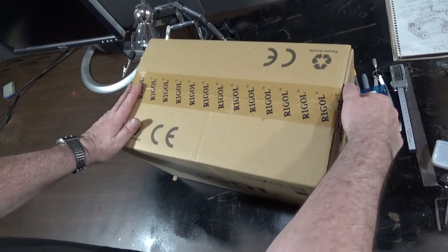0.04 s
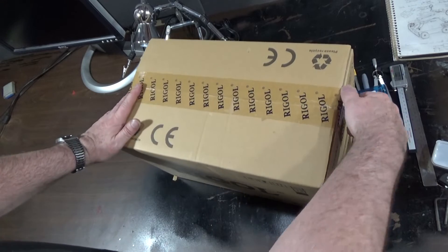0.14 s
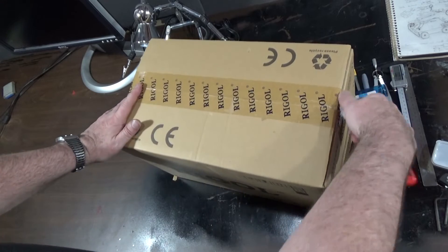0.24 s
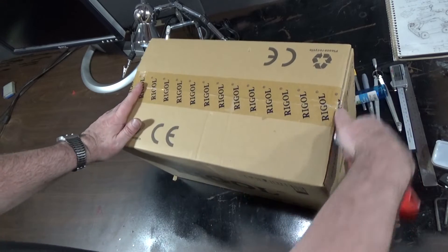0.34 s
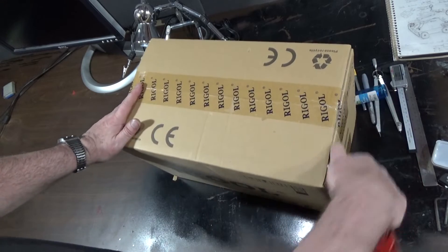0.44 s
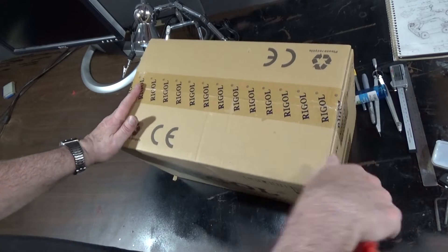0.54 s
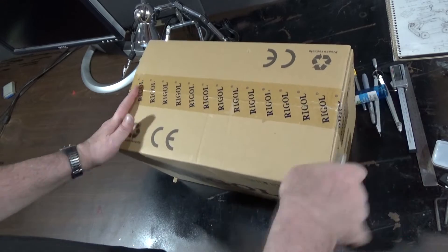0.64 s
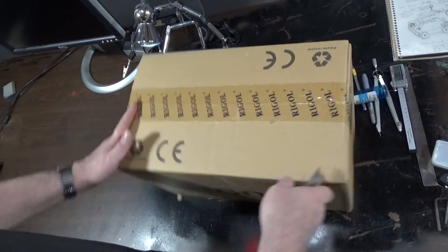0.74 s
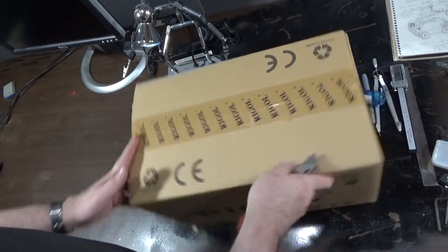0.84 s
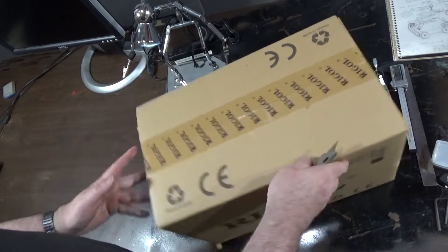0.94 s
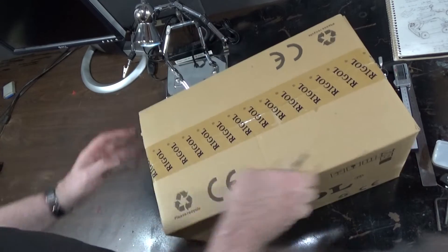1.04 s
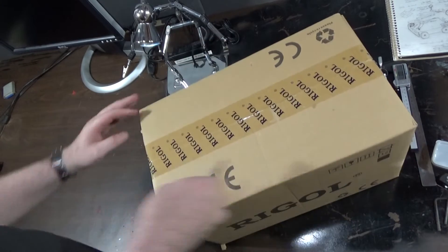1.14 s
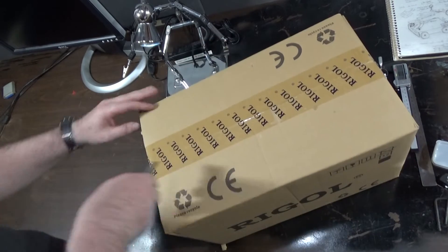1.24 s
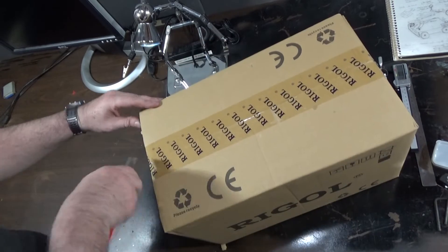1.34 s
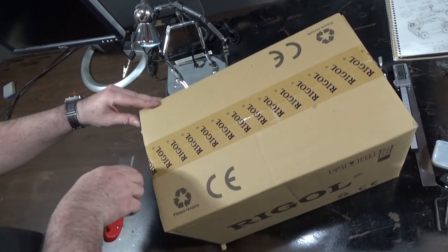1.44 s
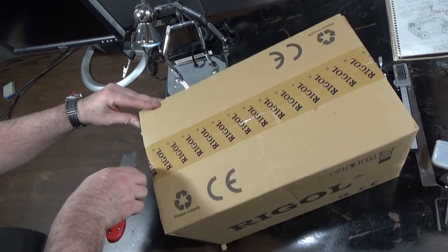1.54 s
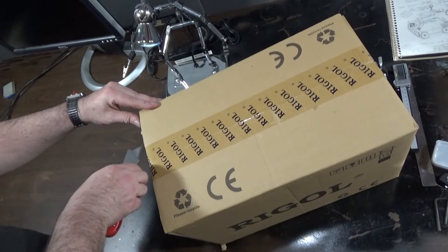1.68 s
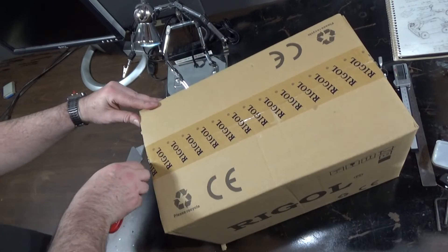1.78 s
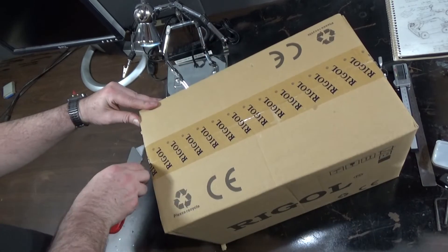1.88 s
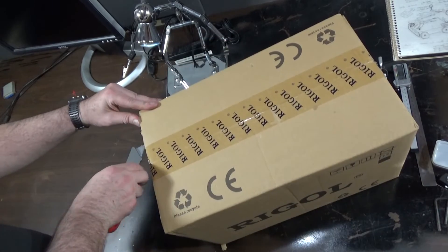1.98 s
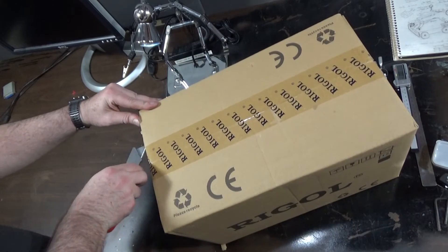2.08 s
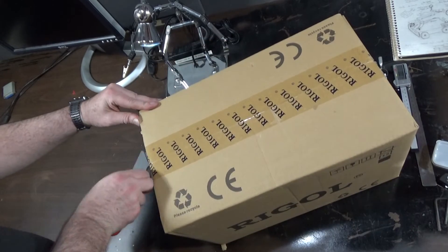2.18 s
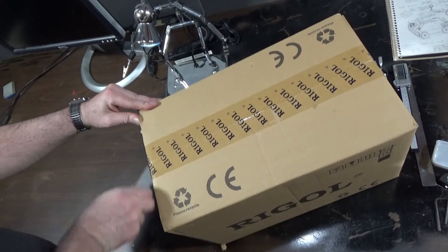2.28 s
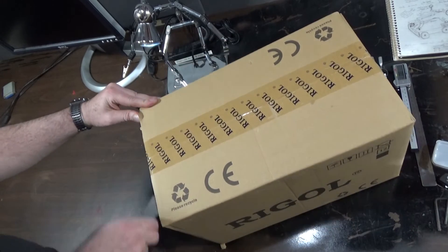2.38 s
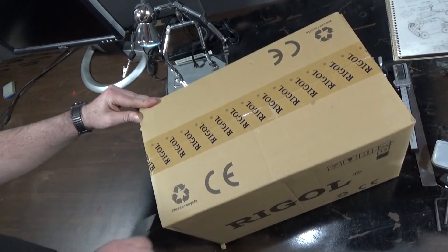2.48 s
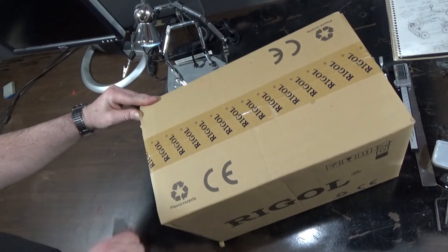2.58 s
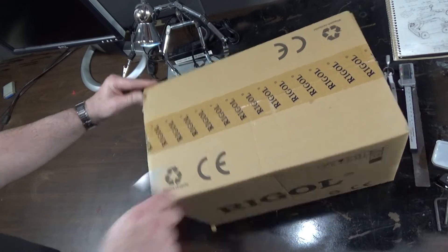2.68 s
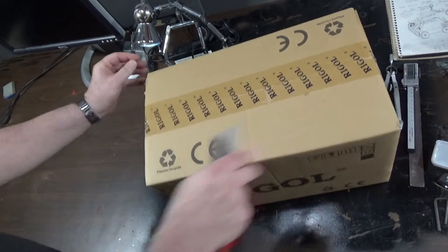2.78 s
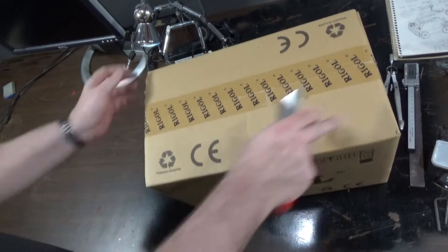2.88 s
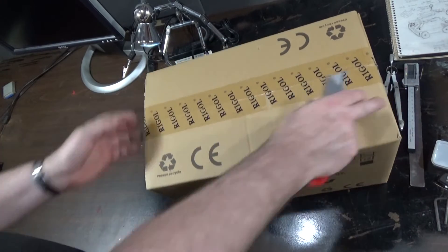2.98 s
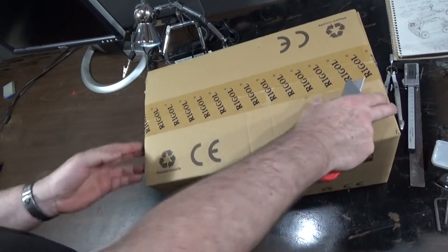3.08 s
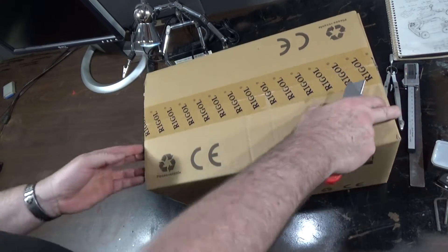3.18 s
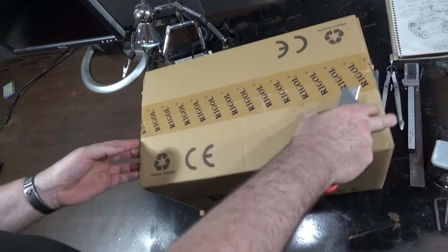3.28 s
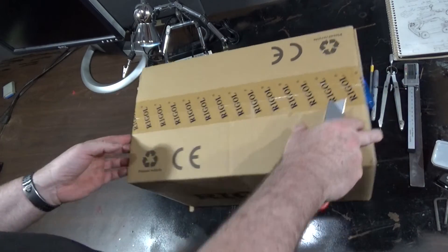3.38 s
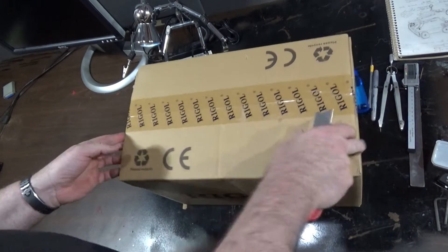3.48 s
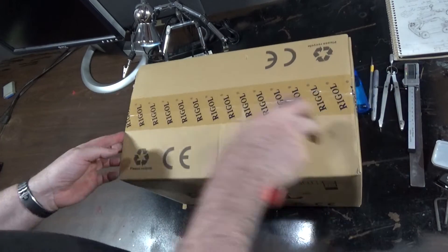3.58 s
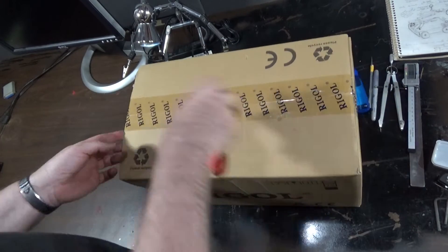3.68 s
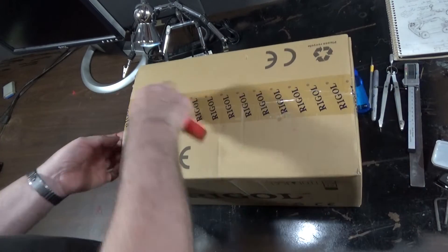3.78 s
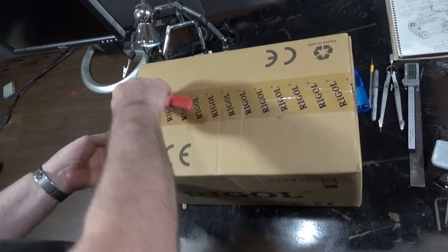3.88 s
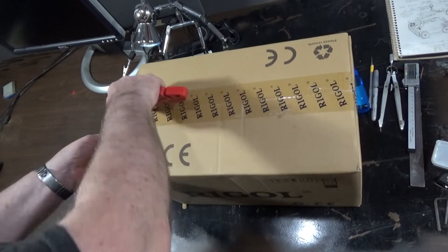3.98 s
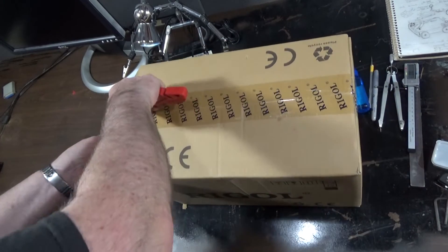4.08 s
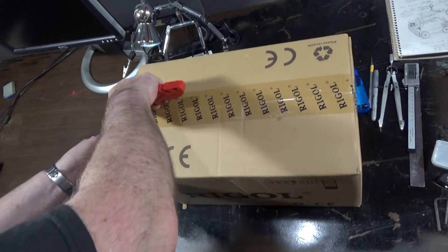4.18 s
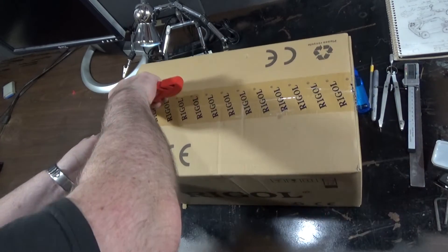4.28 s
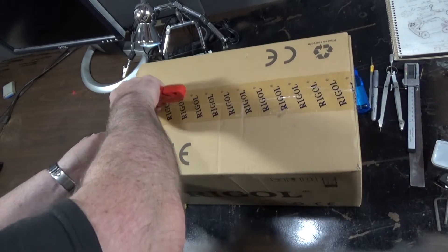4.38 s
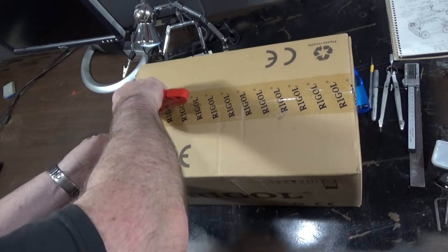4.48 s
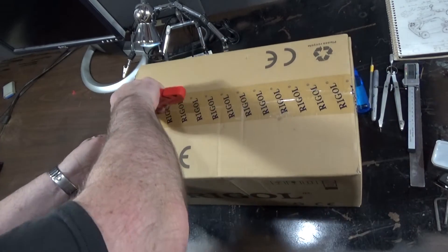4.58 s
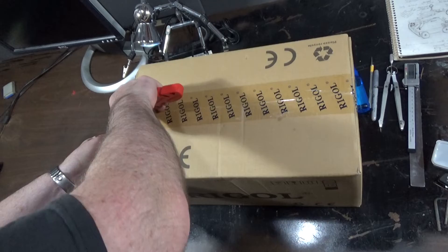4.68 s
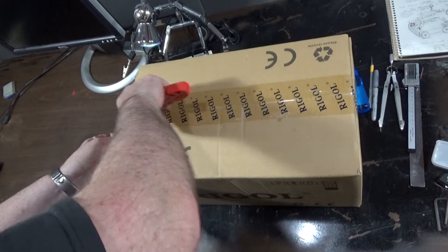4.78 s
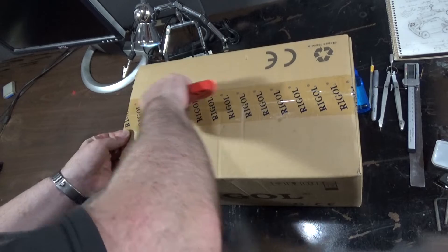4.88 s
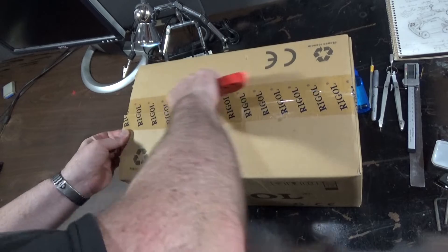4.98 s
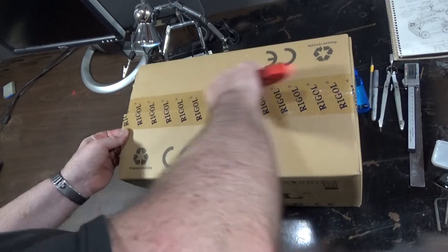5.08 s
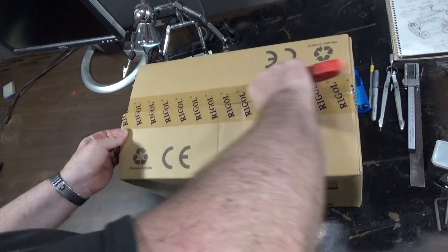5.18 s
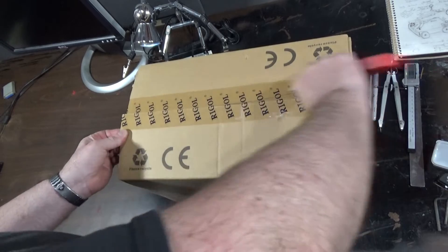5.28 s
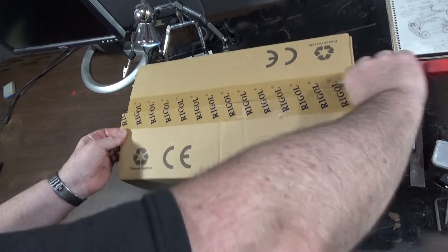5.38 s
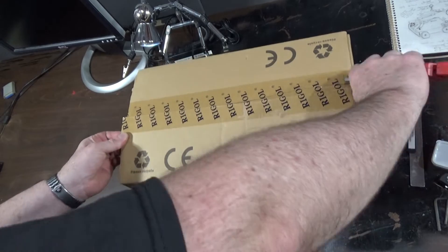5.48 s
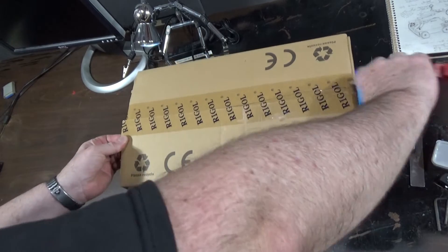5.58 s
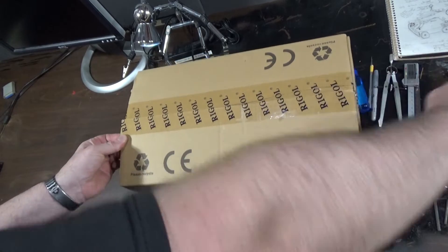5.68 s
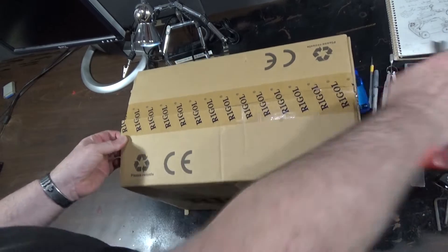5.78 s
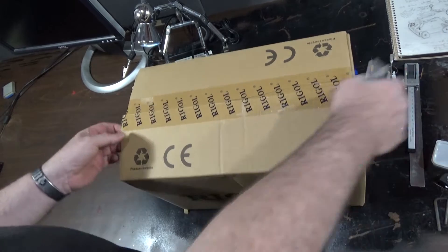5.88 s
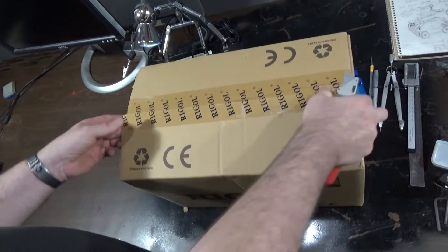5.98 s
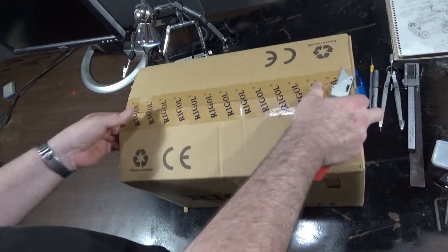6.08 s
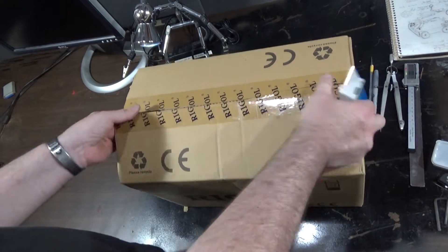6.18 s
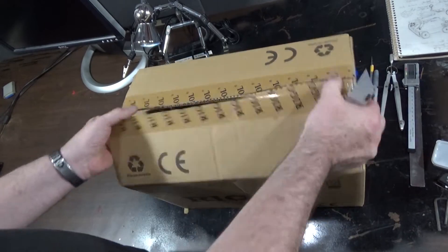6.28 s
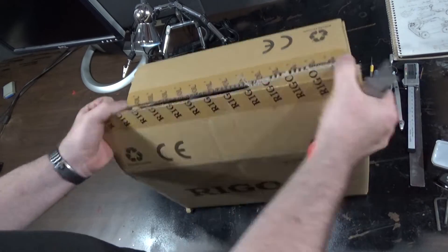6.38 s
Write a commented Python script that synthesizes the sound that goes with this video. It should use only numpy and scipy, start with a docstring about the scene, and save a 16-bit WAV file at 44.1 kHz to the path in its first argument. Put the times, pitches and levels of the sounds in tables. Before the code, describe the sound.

Close up in a small room, taut tape pops and tears, cardboard skids and knocks hollowly, then a blade rips along a seam.

```python
"""A box cutter slits open a taped cardboard box, close by in a small room. Tape pops and tears in short bursts,
and the blade rasps over the cardboard, as random slips that hiss and bumps that make the panels drum.
The box also hisses as it is pushed round on a workbench, and it lands with a row of bumps.
Hands and knife knock, click and brush against it: filtered bursts that ring the panels, or soft friction.
Echoes of the room and a quiet, steady air noise surround it all."""
import sys
import numpy as np
from scipy import signal
from scipy.io import wavfile
from scipy.ndimage import uniform_filter1d, map_coordinates

SR = 44100
rng = np.random.default_rng(int(sys.argv[2]) if len(sys.argv) > 2 else 0)


def wav_record(signal):
    """Record a signal, one row per channel, as 16-bit PCM in the file named by sys.argv[1]."""
    frames = np.transpose(np.atleast_2d(signal))
    bounded = np.clip(frames, -1, 1)
    # unit amplitude maps onto the largest positive 16-bit level
    quanta = np.round(bounded * 32767).astype(np.int16)
    wavfile.write(sys.argv[1], SR, quanta)


N = 283803

# All levels in the tables are relative: the functions that use them may trim them further.
# the long slit down the top seam: (t/s, hiss/dB, drumming/dB)
SEAM_CUT = [(4.77, -42, -50), (4.774, -35.5, -37), (4.826, -32.5, -37), (4.892, -27, -27),
            (4.926, -28, -33.5), (5.07, -22, -17.5), (5.194, -23.5, -16), (5.266, -27, -22.5),
            (5.344, -20, -13.5), (5.46, -24.5, -26.5), (5.5, -35.5, -59), (5.54, -55, -41)]
# colour of the hiss at the taped ends and of tearing tape: (f/Hz, level/dB)
END_HISS = [(400, -9), (750, -0.5), (1200, -2.5), (2000, 0), (5000, -4.5), (8000, 2.5), (10000, -4.5),
            (12000, -18), (16000, -34)]
# colour of the hiss at the edge and of crunching paper: (f/Hz, level/dB)
EDGE_HISS = [(400, -14), (750, 10.5), (1400, 1.5), (2600, -1.5), (4600, -6.5), (6500, -1.5), (9100, -4),
             (12000, -19), (16000, -36)]
# how cuts at the ends and the edge push on the panels: (f/Hz, level/dB)
EDGE_PUSH = [(25, -12), (70, 5), (150, 2.5), (300, 1.5), (500, 3.5), (800, -4), (1500, -10), (3500, -51)]
# how sliding and brushing push on the panels: (f/Hz, level/dB)
SLIDE_PUSH = [(25, -21), (70, -5.5), (130, -5), (220, -4), (400, -3.5), (800, -2), (1400, -21.5),
              (3000, -51)]


def cutting():
    """The scrape of the blade also rings blade, tape and box corner, and the lid drones along."""
    scrape = end_cuts() + seam_cut() + edge_cuts()
    return scrape + blade_ring(scrape) + corner(scrape) + lid_drone()


def end_cuts():
    """The blade is drawn through the tape at the ends of the box, with few, uneven slips: it crackles."""
    # (start t/s, rise/s, hold/s, fall/s, hiss/dB, drumming/dB)
    end_strokes = [(0.15, 0.055, 0.16, .17, -36.5, -47.5), (2.178, 0.016, .008, 0.055, -32, -42),
                   (2.23, .12, 0.11, 0.11, -36, -41.5)]
    gains = strokes(end_strokes, shape=2.2, drum_share=1.0)
    grip = grip_of(judder_db=1.0, judder_hz=172.4, catches_per_s=130, jump=0.3)
    scrape = friction(gains, END_HISS, EDGE_PUSH, slips_per_s=3400, spread_db=3.0, grip=grip,
                      bumps_per_s=600, hiss_db=1.5, rasp_db=-5, drum_db=2.5, bite=0.1)
    return scrape + tearing(gains[0], per_s=70, level_db=-9.5)


def seam_cut():
    """A steady grip along the seam; an echo off the box sways as the blade moves."""
    # colour of the hiss: (f/Hz, level/dB)
    seam_hiss = [(400, -10), (780, 0), (1150, -5.5), (2200, -5), (3000, -11.5), (4900, -13.5), (6200, -6.5),
                 (8500, -6), (11400, -16), (16000, -38)]
    # how the bumps push on the panels: (f/Hz, level/dB)
    seam_push = [(25, -30), (80, -18), (140, -2.5), (260, 1.5), (370, -1), (550, -4), (800, -3.5),
                 (1200, -12), (3000, -39)]
    gains = long_cut(SEAM_CUT)
    grip = grip_of(judder_db=1.0, judder_hz=172.4, catches_per_s=130, jump=0.3)
    scrape = friction(gains, seam_hiss, seam_push, slips_per_s=6400, spread_db=1.5, grip=grip,
                      bumps_per_s=1500, hiss_db=-1.16, rasp_db=-10.5, drum_db=-3.5, bite=0.091)
    scrape = scrape + tearing(gains[0], per_s=90, level_db=-8.0)
    return moving_echo(scrape, delay_ms=1.6, sway_ms=0.17, sway_hz=5, echo_db=-9.5)


def edge_cuts():
    """Two jabs over the far edge and a last cut along it: the blade catches and slips in jerks."""
    # jabs: (start t/s, rise/s, hold/s, fall/s, hiss/dB, drumming/dB)
    jabs = [(5.545, .02, 0.0044, .07, -26.5, -44), (5.6, 0.046, 0.0087, 0.074, -18, -20.5)]
    # last cut: (t/s, hiss/dB, drumming/dB)
    last_cut = [(5.96, -55, -40), (5.976, -35, -28), (6.072, -38, -41), (6.152, -28, -24),
                (6.164, -26.5, -36.5), (6.294, -17.5, -27), (6.342, -23, -14), (6.38, -23, -23.5),
                (6.435, -30, -39)]
    gains = strokes(jabs, shape=0.63, drum_share=0.78) + long_cut(last_cut)
    grip = grip_of(judder_db=2.5, judder_hz=150, catches_per_s=42, jump=0.69)
    scrape = friction(gains, EDGE_HISS, EDGE_PUSH, slips_per_s=5000, spread_db=2.0, grip=grip,
                      bumps_per_s=870, hiss_db=-2.0, rasp_db=-8.5, drum_db=-4.0, bite=0.61)
    return scrape + tearing(gains[0], per_s=70, level_db=-9.5)


def friction(gains, hiss, push, slips_per_s, spread_db, grip, bumps_per_s, hiss_db, rasp_db, drum_db, bite):
    """Fine slips hiss, coarser ones rasp and bumps drum the panels, all following an uneven grip.
    The rasp lies between the two: bite is the share it takes from the drumming."""
    hissing, drumming = gains
    slips = colour(grip * grains(slips_per_s, spread_db), hiss)
    fine = unit(signal.sosfilt(signal.butter(4, 3200, "high", fs=SR, output="sos"), slips))
    coarse = unit(signal.sosfilt(signal.butter(4, 2900, "low", fs=SR, output="sos"), slips))
    # the bumps follow the grip only weakly
    bumps = grip ** 0.18 * grains(bumps_per_s, spread_db=0.5)
    drum = unit(panels(colour(bumps, push)))
    rasping = hissing ** (1 - bite) * drumming ** bite
    return amp(hiss_db) * fine * hissing + amp(rasp_db) * coarse * rasping + amp(drum_db) * drum * drumming


def grip_of(judder_db, judder_hz, catches_per_s, jump):
    """Force at the contact: a fast tremble with sudden catches on top."""
    return amp(judder_db * wander(judder_hz)) * (1 + jump * catches(catches_per_s, relax_s=0.034))


def catches(per_s, relax_s):
    """Tension lets go at random moments, each time with a jump that dies away."""
    jumps = (rng.random(N) < per_s / SR) * rng.uniform(0.17, 1, N)
    return signal.lfilter([1], [1, -np.exp(-1 / (relax_s * SR))], jumps)


def grains(per_s, spread_db):
    """A random train of tiny slips; the spread sets how uneven their sizes are."""
    size = amp(spread_db * np.minimum(rng.exponential(1, N), 4))
    happens = rng.random(N) < per_s / SR
    return unit(size * rng.choice([-1, 1], N) * happens)


def strokes(rows, shape, drum_share):
    """A short stroke gathers speed, holds it and dies away; drumming depends less on speed than hiss,
    or equally when drum_share is one."""
    depth_db = 28  # rise and fall each span this much hiss
    t = np.arange(N) / SR
    gains = np.zeros((2, N))
    for start, rise, hold, fall, hiss_db, drum_db in rows:
        # how far outside the hold we are: 1 is a whole rise or fall away
        away = np.maximum((start + rise - t) / rise, (t - start - rise - hold) / fall)
        speed_db = -depth_db * np.maximum(away, 0) ** shape
        gains += amp([hiss_db + speed_db, drum_db + drum_share * speed_db])
    return gains


def long_cut(rows):
    """Gains of hiss and drumming along one long cut, silent before and after."""
    t = np.arange(N) / SR
    s, *levels = np.transpose(rows)
    gains = amp([np.interp(t, s, db) for db in levels]) * (t >= s[0]) * (t < s[-1])
    # abs removes tiny negative rounding errors
    return abs(uniform_filter1d(gains, size=128))


def tearing(gain, per_s, level_db):
    """Fibres of the tape part in tiny bursts ahead of the blade and crackle."""
    bursts = catches(per_s, relax_s=0.0011) * rng.choice([-1, 1], N)
    return amp(level_db) * gain * unit(colour(bursts, END_HISS))


def blade_ring(scrape):
    """Blade and stretched tape ring at narrow resonances."""
    # (f/Hz, width/Hz, level/dB)
    blade_modes = [(1605, 54, -1.5), (2210, 46, 1), (2670, 47, -53), (3910, 54, -9), (4290, 60, -5.5),
                   (6460, 130, -10), (7250, 40, -45), (8280, 100, -13), (8950, 120, -7)]
    return sum(amp(db) * resonance(scrape, hz, width) for hz, width, db in blade_modes)


def corner(scrape):
    """The stiff corner of the box gives a hollow note to whatever scrapes near it."""
    once = resonance(scrape, hz=790, width_hz=27)
    return amp(1) * resonance(once, hz=790, width_hz=27)


def lid_drone():
    """Flute bumps under the blade feed a gliding lid resonance: its pitch depends on where the blade presses."""
    # (t/s, f/Hz)
    lid_pitch = [(4.8, 190), (4.95, 228), (5.04, 500), (5.12, 378), (5.22, 324), (5.31, 439), (5.42, 312)]
    width_hz, level_db = 35, -7.0
    hz = np.interp(np.arange(N) / SR, *np.transpose(lid_pitch))
    turn = np.exp(2j * np.pi * np.cumsum(hz) / SR)
    r = np.exp(-2 * np.pi * width_hz / SR)
    # shift the bumps down by the pitch, smooth them there, and shift them back up
    ring = signal.lfilter([1], np.poly([r, r]), grains(per_s=1000, spread_db=-0.5) / turn)
    return amp(level_db) * unit((turn * ring).real) * long_cut(SEAM_CUT)[1]


def moving_echo(x, delay_ms, sway_ms, sway_hz, echo_db):
    """An echo off the box whose path changes as the contact moves, so that bands glide through the sound."""
    echo = amp(echo_db)
    late = (delay_ms + sway_ms * wander(sway_hz)) * SR / 1000  # samples
    delayed = map_coordinates(x, [np.arange(N) - late], order=3)
    return (x + echo * delayed) / np.hypot(1, echo)


def pops():
    """Taut tape pops as the blade first goes in: very short, bright cracks."""
    # (t/s, level/dB)
    tape_pops = [(0.134, -8), (0.1485, -22), (0.187, -22), (0.1964, -4.5), (0.2023, -8), (0.214, -23),
                 (0.225, -15), (0.241, -10), (0.2484, -11), (0.2605, -19), (0.2704, -3), (0.299, -7.5),
                 (0.303, -6), (0.312, -5.5), (0.3318, -10), (0.34, -9), (0.378, -17)]
    out = np.zeros(N)
    for s, db in tape_pops:
        add(out, s, snap(db - 6.5, hz=9100, decay_ms=0.82, rustle_db=-29, low_db=-17, under_db=-10, over_db=-12))
    return out


def rips():
    """The tape tears a little way at once: cracks with a softer start, most of them longer."""
    # (t/s, level/dB, centre f/Hz, decay/ms)
    tape_rips = [(2.198, -13, 4100, 4.8), (2.323, -22, 4200, 37), (2.468, -14, 7960, 12),
                 (2.524, -20, 5800, 5.7), (4.8646, -11, 5900, 1.8), (5.9237, -25.5, 4230, 4),
                 (5.9734, -20, 6100, 4), (6.095, -14, 6700, 2.2), (6.143, -14, 5640, 5.8),
                 (6.1905, -8, 5960, 5), (6.223, -11, 6000, 4.8), (6.2517, -13, 5200, 2.4),
                 (6.272, -14, 7000, 1.1), (6.302, -11, 8000, 2.3), (6.3178, -7.5, 2400, 4.6),
                 (6.365, -11, 1400, 19)]
    out = np.zeros(N)
    for s, db, hz, decay_ms in tape_rips:
        add(out, s, snap(db - 6.0, hz, decay_ms, rustle_db=-27, attack_s=0.0008))
    return out


def clicks():
    """The knife clicks and taps on the box, each time around its own pitch; the first row, at 1.005 s, is the
    crack of the box landing on the bench."""
    # (t/s, level/dB, centre f/Hz)
    knife_clicks = [(1.005, -9, 9400), (1.116, -25, 2660), (1.274, -26.5, 7500), (1.507, -30.5, 3330),
                    (1.5886, -31.5, 4550), (1.673, -27.5, 8250), (2.180, -6.5, 6300), (2.2315, -19, 4800),
                    (2.353, -8, 5940), (2.970, -22.5, 6700), (2.9845, -16.5, 7600), (3.0577, -24.5, 2520),
                    (3.202, -28, 7000), (3.7363, -8, 8100), (3.843, -11.5, 13500), (3.933, -25, 5800),
                    (3.9443, -26, 3380), (4.295, -21, 8600), (4.301, -18, 10400), (4.363, -27, 2800),
                    (4.4034, -23, 2100), (4.6229, -30.5, 3530), (4.777, -12.5, 6000)]
    out = np.zeros(N)
    for s, db, hz in knife_clicks:
        add(out, s, snap(db - 6, hz, decay_ms=1.58, rustle_db=-22))
    return out


def snap(db, hz, decay_ms, rustle_db, attack_s=0, low_db=-27, under_db=-9, over_db=-13):
    """A sharp crack and a short rustle around one pitch."""
    t = np.arange(4096) / SR
    rustle_s = 0.018
    fade = np.exp(-1000 * t / decay_ms) + amp(rustle_db) * np.exp(-t / rustle_s)
    attack = np.minimum((t + 1 / SR) / (attack_s + 1 / SR), 1)
    burst = rng.choice([-1., 1.], len(t)) * fade * attack
    # the size of the snapping patch sets its pitch; the top treble is always weak
    crack = colour(burst, [(hz / 12, low_db), (hz / 2, under_db), (hz, 0), (hz * 2, over_db)])
    crack = colour(crack, [(9500, 9.0), (12500, -6), (16000, -11)])
    # the filters leave the energy of the burst unchanged
    return amp(db) * crack * np.linalg.norm(burst) / np.linalg.norm(crack)


def sliding():
    """The box is pushed round on the bench and skids as it lands: dense, even friction with a swaying echo."""
    # (start t/s, rise/s, hold/s, fall/s, hiss/dB, drumming/dB)
    pushes = [(0.425, 0.046, 0.045, 0.074, -23, -34), (0.66, 0.055, 0.069, 0.25, -26, -45),
              (0.73, 0.13, .09, 0.12, -22.5, -42), (0.98, 0.014, 0.012, .19, -33.5, -29.5),
              (2.595, 0.13, 0.0052, 0.21, -23.5, -38.5), (3.2, 0.15, 0.13, 0.2, -28, -42.5)]
    # colour of the hiss: (f/Hz, level/dB)
    slide_hiss = [(410, -45), (700, -4), (1020, -5.5), (1380, -4), (1840, -3), (2880, -2.5), (5120, -1.5),
                  (6150, 5), (8760, 3.5), (11100, -10), (14200, -22.5), (16000, -32)]
    gains = strokes(pushes, shape=1.36, drum_share=0.6)
    grip = grip_of(judder_db=1.28, judder_hz=69.4, catches_per_s=78, jump=0.2)
    box = friction(gains, slide_hiss, SLIDE_PUSH, slips_per_s=22000, spread_db=3.5, grip=grip,
                   bumps_per_s=1000, hiss_db=-1.5, rasp_db=-3.0, drum_db=0.5, bite=0.46)
    return moving_echo(box, delay_ms=0.745, sway_ms=0.072, sway_hz=1.9, echo_db=-17)


def landing():
    """The box drops back on the bench and rocks at an even pace, each bump weaker and duller than the last."""
    landing_s, rock_s = 1.007, 0.035  # first bump, time between bumps
    out = np.zeros(N)
    for k in range(5):
        thud_db = -15 - k * 3
        hollow_db = -11 - k * 8
        bump = blow(thud_db, 200, hollow_db, crunch_db=hollow_db - 3, ring_hz=540)
        add(out, landing_s + k * rock_s, bump)
    return out


def knocks():
    """Firm blows of bench and knife on the box: the harder the corner is hit, the more the paper crunches. The
    row at 1.273 s is a hand touching the box."""
    # (t/s, thud/dB, thud f/Hz, hollow knock/dB, ring of the knock f/Hz)
    firm_blows = [(0.135, -26.5, 162, -27, 790), (0.444, -26, 150, -25, 557), (0.889, -16, 122, -19.5, 540),
                  (1.273, -34, 130, -53, 776), (1.837, -30, 192, -31.5, 795), (2.219, -19, 179, -20.5, 764),
                  (2.353, -13, 220, -9.5, 774), (2.529, -43, 260, -22.5, 790), (3.148, -26, 195, -31, 710),
                  (3.527, -26.5, 200, -23, 720), (3.543, -15, 213, -12, 710), (3.628, -45, 200, -27.5, 790),
                  (3.828, -31.5, 242, -36, 764), (4.099, -27.5, 233, -30, 780), (4.497, -36, 210, -45, 770),
                  (4.776, -24.5, 212, -19.5, 755), (4.963, -17, 265, -18.5, 700),
                  (5.5542, -21, 262, -24.5, 610), (5.651, -24, 203, -14.5, 745),
                  (5.905, -22, 150, -50, 760), (6.142, -24, 199, -18, 790), (6.225, -19.5, 200, -15.5, 750),
                  (6.327, -21, 186, -11.5, 734)]
    out = np.zeros(N)
    for s, db, hz, hollow_db, ring_hz in firm_blows:
        add(out, s, blow(db - 1, hz, hollow_db, hollow_db - 9, ring_hz))
    return out


def blow(thud_db, hz, hollow_db, crunch_db, ring_hz=764):
    """A blow and the rattle of the flaps ring the whole box low and its stiff corner higher; the paper crunches."""
    t = np.arange(8192) / SR
    rattle_s, crunch_s = 0.0089, 0.014
    rattle, paper = rng.standard_normal((2, len(t)))
    push = (t == 0) + amp(-20) * rattle * np.exp(-t / rattle_s)
    low_shape = [(25, -21), (hz / 2, -9), (hz, 0), (hz * 2, -8), (hz * 6, -32), (16000, -70)]
    thud = panels(colour(push, low_shape))
    high_shape = [(150, -35), (500, -0.5), (770, -8), (1100, -7.5), (2000, -7.5), (6000, -23), (16000, -34)]
    hollow = panels(colour(push, high_shape))
    hollow = hollow + amp(15) * resonance(hollow, ring_hz, width_hz=64)
    crunch = colour(paper * np.exp(-t / crunch_s), EDGE_HISS)
    # each part is set by its peak
    parts = ((thud_db, thud), (hollow_db, hollow), (crunch_db, crunch))
    return sum(amp(db) * sound / abs(sound).max() for db, sound in parts)


def panels(push):
    """The walls follow a push at once and then ring briefly."""
    # (f/Hz, level/dB, time to fall by 60 dB/s)
    panel_modes = [(90, -24, 0.11), (104, -12, 0.071), (153.2, -3.5, 0.13), (208.3, -1, 0.1),
                   (230.4, -1.5, 0.1), (329.6, -5, 0.14), (391, 0.5, 0.072), (500, -3, 0.044),
                   (562, -20, 0.073), (717, 0.5, 0.021), (830, -16, 0.016), (880, -29.5, 0.076),
                   (923, -26, 0.019), (1123, -20.5, 0.1), (1400, -11, 0.1), (1540, 2.5, 0.025),
                   (2300, -7, .08)]
    t = np.arange(SR // 4) / SR
    ring = sum(amp(db - 60 * t / t60) * np.cos(2 * np.pi * hz * t) for hz, db, t60 in panel_modes)
    response = amp(-43) * ring
    response[0] += 1
    return signal.oaconvolve(push, response)[:len(push)]


def brushing():
    """Hands brush over the cardboard: softer friction with fewer slips than the sliding box."""
    # (start t/s, rise/s, hold/s, fall/s, hiss/dB, drumming/dB)
    wipes = [(0.105, 0.015, 0.023, 0.02, -31, -35), (0.57, 0.064, 0.035, 0.082, -38.5, -46),
             (1.25, 0.047, .01, 0.47, -38, -46.5), (2.92, 0.059, 0.041, 0.1, -46, -41),
             (3.11, 0.031, 0.017, 0.11, -41, -41), (3.66, 0.04, 0.22, 0.23, -41.5, -46),
             (4.72, 0.034, .01, .03, -38, -47), (5.82, 0.015, 0.11, 0.15, -42, -35)]
    # colour of the hiss: (f/Hz, level/dB)
    brush_hiss = [(400, -8), (750, 6), (1700, -3), (4000, -4.5), (9000, -1), (12000, -15), (16000, -26)]
    gains = strokes(wipes, shape=0.66, drum_share=0.75)
    grip = grip_of(judder_db=1.28, judder_hz=69.4, catches_per_s=78, jump=0.2)
    return friction(gains, brush_hiss, SLIDE_PUSH, slips_per_s=8000, spread_db=2.0, grip=grip,
                    bumps_per_s=500, hiss_db=-6.5, rasp_db=-12.5, drum_db=-6.5, bite=0.45)


def touches():
    """Fingers and blade settle on the cardboard: light blows with plenty of crunch."""
    # (t/s, level/dB)
    light_contacts = [(1.762, -36), (1.785, -39), (1.9, -36.5), (1.932, -40.5), (2.063, -33.5),
                      (2.156, -37), (3.127, -34.5), (3.738, -28.5), (3.904, -37.5), (4.296, -37.5),
                      (4.402, -37.5)]
    out = np.zeros(N)
    for s, db in light_contacts:
        add(out, s, blow(db - 4, 205, hollow_db=db + 3.0, crunch_db=db + 4.0))
    return out


def tool_ring():
    """The landing shakes loose metal tools on the bench, which ring faintly as fading sines."""
    # (f/Hz, level/dB, time to fall by 60 dB/s)
    tool_modes = [(1130, -43, 0.8), (1564, -41, 0.8), (1610, -43.5, 0.74), (2100, -44, 0.76)]
    out = np.zeros(N)
    t = np.arange(SR) / SR
    ring = sum(amp(db - 60 * t / t60) * np.sin(2 * np.pi * hz * t) for hz, db, t60 in tool_modes)
    add(out, 1.007, ring)  # the moment of landing, in s
    return out


def fidgeting():
    """Fingers shift their hold on box and knife: faint, dull ticks of skin ring the panels."""
    # (start t/s, end t/s); a row that ends before it starts stays silent
    fidget_spans = [(0.0, 0.16), (0.55, 0.66), (1.1, 1.56), (1.76, 1.66), (3.751, 3.3)]
    t = np.arange(N) / SR
    active = sum(1. * (t >= start) * (t < end) for start, end in fidget_spans)
    holding = uniform_filter1d(active, size=2048)
    dull = [(60, -12), (250, -2), (800, 0), (2000, -5), (4000, -13), (9000, -16), (16000, -31)]
    ticks = colour(grains(per_s=260, spread_db=4.0), dull)
    return amp(-53) * holding * unit(panels(ticks))


def reflections(x, speed, delay_s):
    """Dense echoes of energy one: noise in which each band dies at its own pace."""
    # (f/Hz, time to fall by 60 dB/s, which speed then divides)
    room_decay = [(150, 0.68), (500, 0.38), (2500, 0.2), (7000, 0.16), (15000, 0.21)]
    hz, t, bands = signal.stft(rng.standard_normal(SR // 2), SR, nperseg=256)
    fade = amp(-60 * speed * t / read(room_decay, hz)[:, None])
    tail = signal.istft(bands * fade, SR, nperseg=256)[1]
    tail = np.pad(tail, (round(delay_s * SR), 0))
    return signal.oaconvolve(x, tail / np.linalg.norm(tail))[:N]


def air():
    """Still air of the room: quiet, steady noise, partly shared by both channels."""
    # (f/Hz, level/dB)
    air_colour = [(12, -61), (20, -7.5), (193, -3), (367, -6), (446, -12), (780, -5.5), (873, -8.5),
                  (1480, -12), (2080, -9.5), (4670, -19.5), (8180, -17), (14700, -35.5), (16000, -36)]
    common, left, right = (unit(colour(noise, air_colour)) for noise in rng.standard_normal((3, N)))
    return amp(-55.0) * (common + 0.61 * np.array([left, right]))


def amp(db):
    """Turns dB into a factor."""
    return 10 ** (np.asarray(db) / 20)


def unit(x):
    """Scales to an rms of one."""
    return x / np.sqrt(np.mean(x ** 2) + 1e-20)


def read(points, hz):
    """Joins (Hz, value) points on a log-frequency axis."""
    f, value = np.transpose(points)
    return np.interp(np.log(hz + 1), np.log(f + 1), value)


def add(mix, s, sound):
    """Mixes a sound in at time s, cut off at the end of the mix."""
    part = mix[round(s * SR):][:len(sound)]
    part += sound[:len(part)]


def colour(x, points, size=4096):
    """Causal filter with the given (Hz, dB) shape."""
    gain = amp(read(points, abs(np.fft.fftfreq(size, 1 / SR))))
    log_gain = np.log(gain + 1e-5)
    # the Hilbert transform gives the phase that makes the filter respond soonest
    taps = np.fft.ifft(np.exp(np.conj(signal.hilbert(log_gain)))).real
    return signal.oaconvolve(x, taps[:size // 2])[:len(x)]


def wander(hz):
    """Slow chance of rms one, up to about hz: straight lines between random points."""
    knots = np.arange(N) * 2 * hz / SR
    return unit(np.interp(knots, np.arange(N), rng.standard_normal(N)))


def resonance(x, hz, width_hz):
    """One resonance of gain one."""
    return signal.lfilter(*signal.iirpeak(hz, hz / width_hz, SR), x)


def scene():
    """The box is straight ahead; echoes from bench and walls give it width."""
    # side against mid: (f/Hz, level/dB)
    side_colour = [(40, -18), (100, -42), (300, -26), (600, -16.5), (1200, -12), (2500, -16), (5000, -10),
                   (8500, -21.5), (13000, -2.5)]
    direct = cutting() + pops() + rips() + clicks() + sliding() + landing() + knocks()
    direct = direct + brushing() + touches() + tool_ring() + fidgeting()
    mid = direct + amp(-12.5) * reflections(direct, speed=1.74, delay_s=.004)
    side = colour(reflections(direct, speed=1.5, delay_s=.0003), side_colour)
    # the middle tones of the box lean to the right
    side -= amp(-25) * resonance(mid, hz=700, width_hz=1100)
    return np.array([mid + side, mid - side]) + air()


def record(dry):
    """A steep low-pass removes everything above about 16 kHz."""
    low_pass = signal.firwin(511, 16000, window=("kaiser", 9), fs=SR)
    return signal.oaconvolve(dry, low_pass[None], "same")


dry = scene()
out = record(dry)
wav_record(out)
```